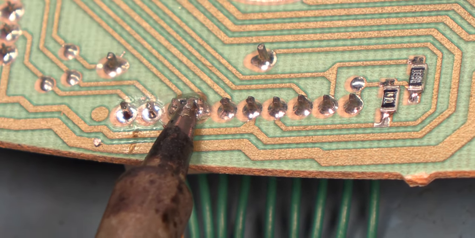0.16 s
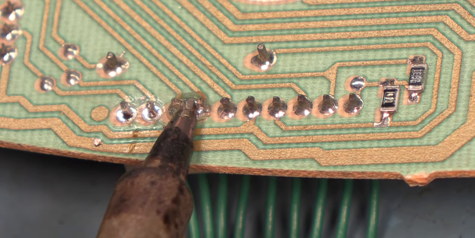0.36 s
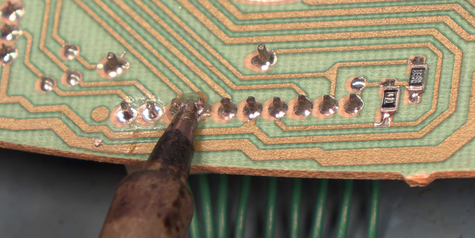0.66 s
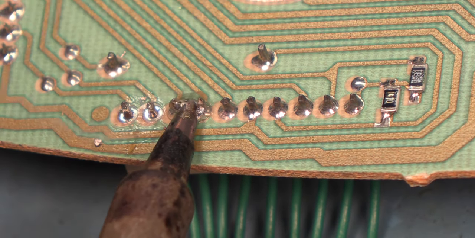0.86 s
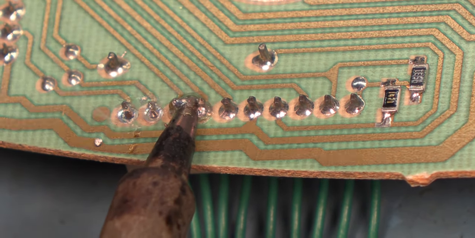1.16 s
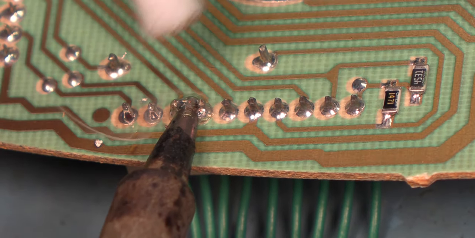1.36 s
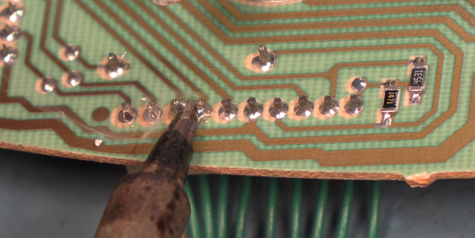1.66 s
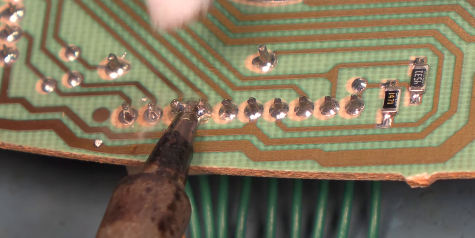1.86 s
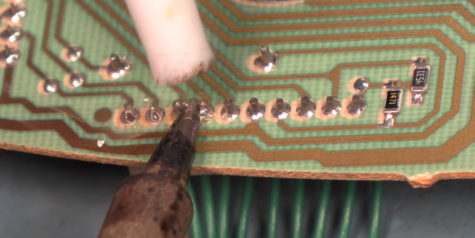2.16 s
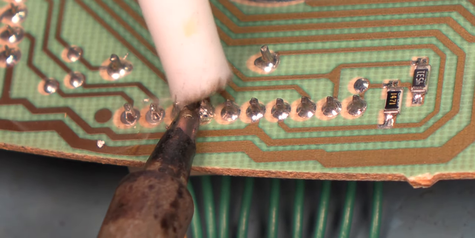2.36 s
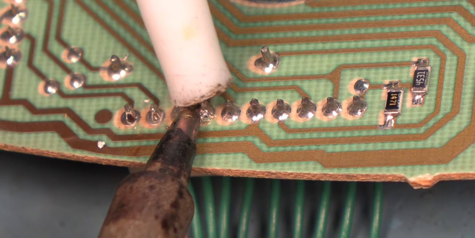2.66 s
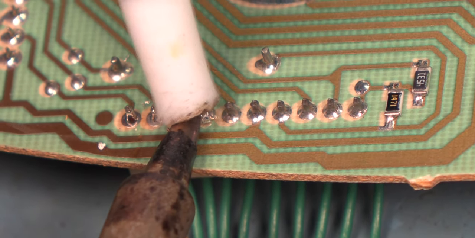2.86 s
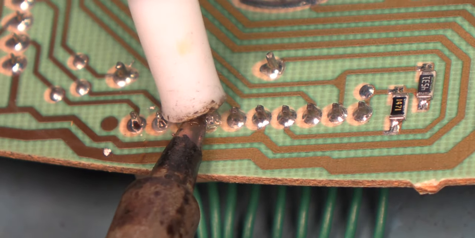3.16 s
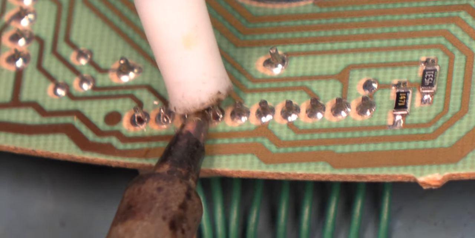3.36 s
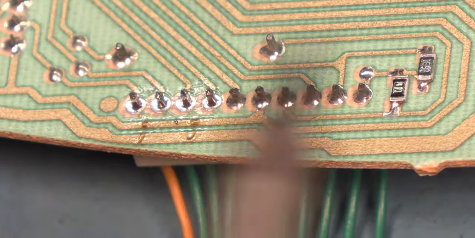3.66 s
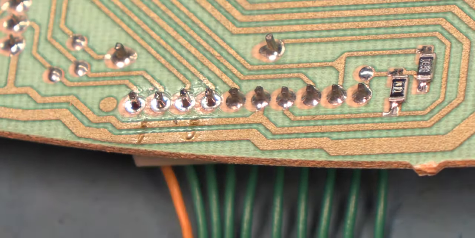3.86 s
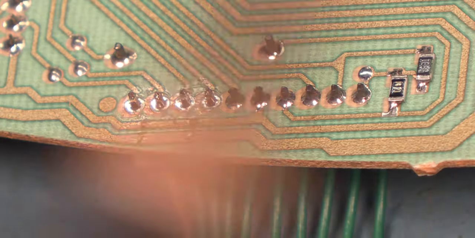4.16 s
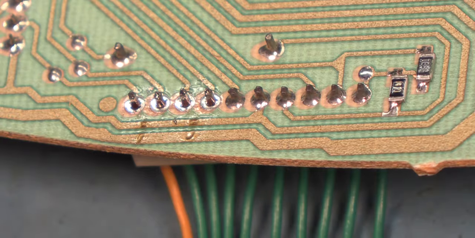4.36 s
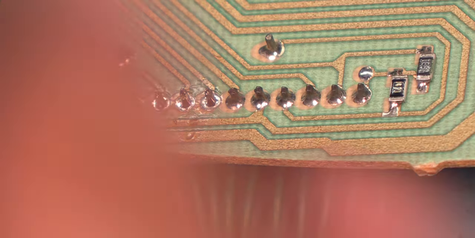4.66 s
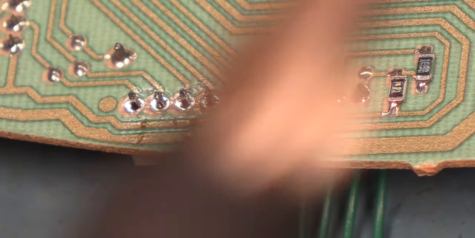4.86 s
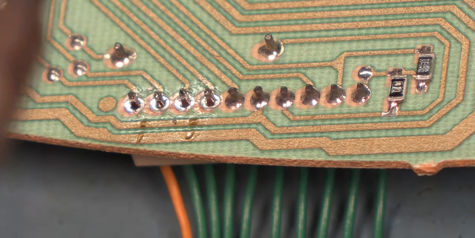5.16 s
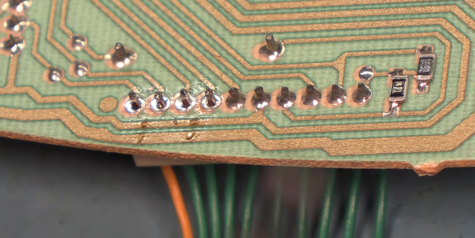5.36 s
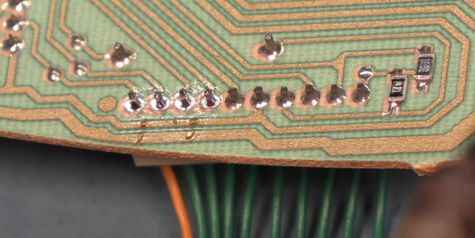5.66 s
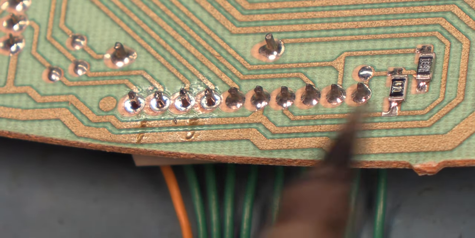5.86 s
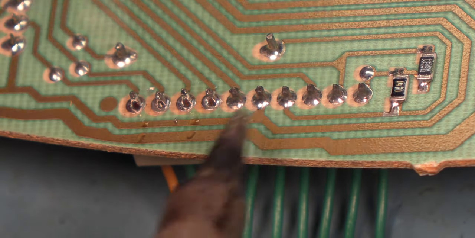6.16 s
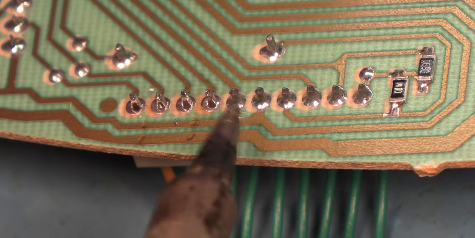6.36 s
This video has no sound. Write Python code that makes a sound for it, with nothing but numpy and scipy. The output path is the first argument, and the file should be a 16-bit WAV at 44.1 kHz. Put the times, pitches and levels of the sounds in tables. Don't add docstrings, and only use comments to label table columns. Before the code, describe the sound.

Quiet workbench handling, then a loud plastic plunger snap, two scraping re-cocking strokes with hard clicks, a faint spring hum and deep bench knocks.

```python
import sys
import numpy as np
from scipy import signal
from scipy.fft import rfft, irfft, next_fast_len
from scipy.io import wavfile
from scipy.ndimage import map_coordinates

SR = 44100
rng = np.random.default_rng(int(sys.argv[2]) if len(sys.argv) > 2 else 0)


def magnitude_from_level(level_db):
    exponent = np.asarray(level_db, float) / 20
    return 10 ** exponent


def generate_wav(sig):
    pcm = np.round(np.clip(np.atleast_2d(sig).T, -1, 1) * 32767).astype(np.int16)
    wavfile.write(sys.argv[1], SR, pcm)


N = 287311

# f/Hz, density/dB per Hz
ROOM_TONE_SPECTRUM = [(12, -28.5), (20, 2.5), (80, -4.5), (123, -3.5), (150, -9), (210, -13.5), (678, -34),
                      (923, -21), (1030, -27.5), (10200, -38.5), (16000, -49)]
# f/Hz, t60/s
ROOM_T60 = [(200, 0.73), (500, 0.24), (1000, 0.16), (3000, 0.21), (6000, 0.19), (14000, .17)]
ROOM_TONE_DB, ROOM_DB = -67, -11.5
HUM_HZ, HUM_DB = 120, -79.5

# t/s, rustle level/dB
HAND_MOTION = [(0.0, -75), (.34, -69), (.56, -75), (.85, -73.5), (1.29, -74), (1.47, -78), (2.27, -99),
               (2.94, -89), (3.5, -85.5), (4.11, -64.5), (4.3, -72), (4.44, -78), (4.57, -45), (4.75, -61),
               (4.91, -40), (5.08, -65), (5.29, -74.5), (6.51, -73)]
# f/Hz, density/dB per Hz
RUSTLE_SPECTRUM = [(530, -32.5), (900, -1), (1170, -7), (1320, -1.5), (2090, -2), (5040, -5),
                   (13200, -18.5), (16000, -29.5)]
# from t/s, to t/s, rumble level/dB
LEANS = [
    (0.0, 0.83, -60.5),
    (1.0, 2.6, -76.5),
    (3.047, 3.566, -55),
    (3.76, 4.152, -63),
    (4.541, 4.64, -56),
    (5.453, 5.478, -42),
    (5.833, 5.902, -45),
    (6.0, 6.397, -55),
]
LEAN_IN_DB_PER_S, LEAN_OFF_DB_PER_S = 118, 49.5

# f/Hz, level/dB, t60/s
BENCH_MODES = [(67, 3, 0.22), (87, 5.5, 0.31), (118, 7.5, 0.25), (148, 3, 0.19), (177.24, 6.5, 0.32),
               (207, 4, 0.25), (268, 11, 0.1), (365, 4, 0.18), (480, 3.5, 0.15), (527, 0.5, 0.043),
               (640, -11, 0.053)]
# t/s, peak level/dB, strongest f/Hz, damping by hand (factor)
THUMPS = [(.029, -56.5, 281, 0.88), (.683, -41, 281, 1.8), (1.684, -55, 265, 2), (1.754, -57.5, 256, 0.91),
          (2.599, -52.5, 97, 1.8), (2.958, -50, 125, 3.3), (3.21, -48, 240, 1.5), (3.078, -47.5, 240, 0.82),
          (3.182, -43, 231.5, 1.22), (5.2705, -17.5, 148, 1.37), (5.2705, -27.5, 327, 1.07),
          (5.297, -30, 213, 0.64), (5.358, -17, 177.7, 1.1), (5.358, -32, 362, 1.3), (5.311, -27, 161, 2),
          (5.377, -36, 180, 1.9), (5.406, -18.5, 151, 1.9), (5.403, -31.5, 340, 1.5),
          (5.427, -29, 182, 1.08), (5.628, -45.5, 174, 0.51), (5.701, -59, 196, 0.6),
          (5.815, -42, 200, 0.76), (5.861, -29, 178, 1.1), (5.97, -45, 186.6, 1.1),
          (6.073, -45, 175.8, 0.82), (6.215, -41.5, 168.8, 1.37), (6.327, -41.5, 94.5, 2.5),
          (6.429, -45.5, 173, 1.07)]
# t/s, peak level/dB, strongest f/Hz, damping (factor)
JOLTS = [(3.421, -12.5, 94, 1.48), (3.421, -24, 270, 2.6), (3.435, -21.5, 70, 3.2), (3.439, -27, 215, 1.1),
         (3.478, -36, 205, 1.8), (3.545, -44, 190, 1.1), (3.615, -48.5, 230, 1.36), (3.99, -45, 336.6, 2.8),
         (4.131, -45.5, 204, 1.5), (4.191, -47.5, 262, 2.4), (4.426, -29, 328.6, 2.6),
         (4.599, -42.5, 127, 1.6), (4.631, -45.5, 90.5, 4.4), (4.658, -40, 362, 2.8), (4.753, -32.5, 91, 5),
         (4.892, -45, 362.4, 2.4)]
# t/s, peak level/dB, strongest f/Hz, damping (factor)
HEEL = [
    (.694, -19, 118, 1.01),
    (.722, -22, 118, 1.46),
]
THUMP_RISE_S, JOLT_RISE_S, HEEL_RISE_S = 0.002, 0.0017, 0.0039
HEEL_FOCUS = 0.7
SPREAD_OCTAVES, SPREAD_PER_DAMPING = 0.18, 0.27
# t/s, peak level/dB, strongest f/Hz, t60/s
KNOCKS = [(0.366, -43.5, 370, 0.037), (0.394, -45.5, 352, 0.045), (0.455, -45, 386, 0.033),
          (0.496, -48, 346, 0.043), (1.18, -68, 934, 0.072), (.029, -59, 348, 0.036), (.337, -49, 400, .04),
          (3.075, -54, 420, .03), (3.179, -52.5, 396, 0.023), (3.197, -56.5, 420, 0.026),
          (3.211, -54.5, 406, .03), (3.419, -22, 440, 0.03), (3.421, -22, 1250, 0.03),
          (3.441, -16, 310, 0.03), (3.464, -28.5, 330, 0.03), (3.573, -48.5, 560, 0.036),
          (3.995, -51, 400, .02), (4.135, -42, 527, 0.12), (4.4263, -22, 417, 0.02),
          (4.629, -20.5, 940, 0.023), (4.658, -29, 340, 0.025), (4.7557, -26, 296, 0.012),
          (4.756, -30, 780, 0.011), (4.891, -28, 363, 0.02), (4.892, -26, 820, 0.02),
          (4.631, -29.5, 382, .02), (5.27, -29.5, 325, 0.043), (5.36, -39, 330, 0.04),
          (5.7, -48, 431.4, 0.031)]
KNOCK_OCTAVES = 0.54

# t/s, peak level/dB, brightest f/Hz, width/octaves
TICKS = [(.012, -66, 1700, 0.07), (.1124, -54, 1690, 0.09), (.1319, -50, 1666, 0.12),
         (.3945, -46.5, 1950, 0.2), (.5, -52.5, 1920, 0.29), (1.1767, -41, 2000, .9),
         (1.429, -53.5, 1850, 0.97), (2.9137, -53.5, 1900, 0.34), (3.9285, -56, 1680, 0.21),
         (4.0516, -57.5, 1100, .2), (4.033, -51.5, 890, 0.12), (4.1261, -44.5, 1780, 0.99),
         (4.134, -42.5, 2140, 0.16), (5.2711, -40, 915, 0.62), (5.7018, -49, 1221, 0.12),
         (5.857, -49, 800, 0.5), (6.3094, -60, 1766, 0.33)]
# t/s, peak level/dB, brightest f/Hz, width/octaves
THIN_TICKS = [(.0712, -57, 3200, .12), (.3611, -53, 3200, .7), (.3685, -50, 4830, 0.24),
              (4.009, -52, 5200, 0.067), (3.927, -57, 4500, 0.46), (4.31, -64, 5200, .3),
              (.394, -40, 4200, 0.96), (.4455, -48, 4200, 0.4), (.4557, -39.5, 5100, 0.73),
              (.5658, -56.5, 3350, 0.98), (5.086, -66, 10500, 0.3), (5.125, -48, 3520, 0.27),
              (.6794, -55.5, 3170, .4), (.7362, -52, 4170, 0.27), (.755, -50.5, 3200, 0.45),
              (.745, -54, 9000, .5), (.764, -50.5, 6000, 0.83), (.65, -62, 3300, .2),
              (.624, -63, 7800, 0.17), (.865, -63, 3670, 0.13), (1.1775, -40.5, 2910, 0.29),
              (1.234, -53, 3970, 0.5), (1.2581, -52, 2850, 0.1), (1.2295, -56, 5100, .2),
              (1.1772, -47, 5100, 0.18), (1.1778, -45, 3730, 0.12), (1.6583, -65, 3340, 0.67),
              (2.915, -54, 3760, 0.21), (2.9525, -54.5, 3550, 0.42), (3.3664, -48, 3600, 0.74),
              (4.007, -44.5, 3120, 0.5), (4.0356, -46.5, 3100, 0.1), (4.117, -44, 3300, 0.91),
              (4.1357, -37, 3870, 0.94), (4.189, -48, 4840, 0.56), (4.3264, -51, 4660, 0.5),
              (5.2723, -43, 2840, 0.64), (5.3584, -44, 3890, 0.56), (5.566, -55, 4040, 1),
              (5.7026, -48.5, 3470, 0.22), (5.7294, -55, 3740, 0.4)]
# narrow t60/s, added t60/s per octave, chatter/s
TICK_DECAY = (0.059, 0.017, 0.0014)
# narrow t60/s, added t60/s per octave, chatter/s
THIN_DECAY = (0.011, 0.017, 0.00093)
# t/s, peak level/dB, brightest f/Hz, t60/s, chatter/s
SCUFFS = [
    (5.283, -38, 1700, 0.28, 0.013),
    (5.362, -43.5, 4500, 0.055, 0.021),
    (5.40, -48.5, 1800, 0.11, 0.027),
    (1.185, -54.5, 2300, 0.47, .02),
]
SCUFF_OCTAVES = 1

# t/s, drive level/dB
STAND_DRAG = [(0.0, -107), (0.016, -73), (0.066, -79), (0.134, -64), (0.158, -63), (0.334, -63),
              (0.4, -50.5), (0.414, -63.5), (0.55, -62.5)]
# f/Hz, width/Hz, level/dB
STAND_MODES = [(340, 74, 2.5), (1780, 66, -8.5), (2040, 150, -12), (2910, 71, -18), (3340, 270, -19.5),
               (4500, 300, -17), (5100, 620, -19)]
# t/s, drive level/dB
ARM_DRAG = [(3.72, -76), (3.8, -69.5), (3.92, -64.5), (3.99, -63.5), (4.02, -78)]
# f/Hz, width/Hz, level/dB
ARM_MODES = [(280, 130, 0), (480, 180, 0), (676, 110, -2)]
# t/s, drive level/dB
GRIP_DRAG = [(4.17, -69.5), (4.35, -58), (4.466, -53), (4.6, -62)]
# f/Hz, width/Hz, level/dB
GRIP_MODES = [(240, 63, 3), (690, 130, 4), (1100, 51, -3.5), (1900, 51, -19.5), (2280, 78, -13)]
# t/s, drive level/dB
SPRING_SHAKE = [(4.85, -60), (4.958, -48.5), (5.078, -55), (5.288, -63), (5.442, -56.5), (5.6, -100)]
# f/Hz, width/Hz, level/dB
SPRING_MODES = [(288, 4, -0.5), (458, 2.6, -4), (572, 3.6, -2), (805.6, 8.3, -4.5), (983, 11, 4),
                (1109, 16, -4), (1210, 18, -3), (1291.7, 13, 3), (1418, 10, -4.5), (1540, 36, -8),
                (1950, 55, -12), (2140, 50, -9), (2340, 90, -9.5), (3730, 150, -17)]
# t/s, drive level/dB
CORD_DRAG = [(5.5, -75.5), (5.656, -68.5), (5.926, -65.5), (6.386, -77), (6.51, -80)]
# f/Hz, width/Hz, level/dB
CORD_MODES = [(770, 140, -1), (1230, 126, 2), (1550, 205, 0.5), (2350, 83, -4.5), (2910, 310, -8)]
CORD_RISE_OCTAVES_PER_S = 0.3

# middle t/s, length/s, f/Hz, rms level/dB
SQUEAKS = [(4.541, .008, 6150, -38), (4.555, .014, 6300, -37), (4.58, .022, 6520, -31),
           (4.598, .01, 5600, -35), (4.611, .012, 6750, -32), (4.595, .02, 4700, -36),
           (4.614, .016, 5100, -33), (4.56, .03, 2480, -40.5), (4.6, 0.018, 2700, -40),
           (4.535, .016, 7600, -40), (4.605, .014, 8380, -36), (4.6, .02, 10000, -37),
           (4.78, .008, 6320, -36), (4.795, .012, 5300, -39), (4.835, .02, 6500, -34),
           (4.846, .014, 5630, -33), (4.84, .012, 7700, -36), (4.858, .01, 8300, -34),
           (4.866, .014, 6500, -31), (4.815, .02, 9400, -36), (4.873, .008, 2300, -38),
           (.09, .07, 2960, -73), (.02, 0.032, 1760, -67), (4.95, .08, 2100, -55), (5.045, .03, 2000, -55),
           (5.045, .02, 3800, -58)]
SQUEAK_WIDTH = 0.035
# t/s, peak level/dB
TOUCHES = [(2.9552, -64), (3.0425, -69), (3.0755, -66), (3.1802, -67), (3.1987, -68), (3.213, -68),
           (3.229, -72), (3.33, -65), (3.3654, -57.5), (3.992, -59), (4.196, -56)]
TOUCH_HZ, TOUCH_T60_S, TOUCH_OCTAVES = 1620, 0.03, 0.14
# t/s, peak level/dB, brightest f/Hz, chatter/s
RATTLES = [
    (4.96, -41, 2400, .012),
    (5.005, -48, 2400, .02),
    (5.033, -42, 2900, 0.017),
    (5.084, -45.5, 2500, .004),
    (5.105, -51.5, 2900, .012),
    (5.1756, -60, 2290, 0.0092),
    (5.21, -60.5, 2600, 0.015),
]
RATTLE_T60_S, RATTLE_OCTAVES = 0.08, 0.44

# t/s, rasp level/dB
RELEASE = [(3.4145, -57), (3.421, -25.5), (3.46, -35.5), (3.5, -47), (3.6, -66), (3.72, -95)]
# t/s, rasp level/dB
STROKES = [
    [(4.385, -94), (4.395, -53), (4.42, -38)],
    [(4.434, -30.5), (4.44, -38), (4.48, -45.5), (4.522, -40), (4.544, -34), (4.614, -27), (4.622, -30.5)],
    [(4.73, -59), (4.738, -45), (4.749, -32.5)],
    [(4.764, -33), (4.77, -41), (4.798, -32), (4.864, -30), (4.884, -35)],
]
# f/Hz, density/dB per Hz
RASP_SPECTRUM = [(880, -48), (1500, -19.5), (3060, -3.5), (4500, -5), (6500, -1), (7900, -3), (12900, -8),
                 (16000, -13.5)]
# f/Hz, width/Hz, level/dB
BARREL_MODES = [(2400, 250, -11.5), (3550, 79, -20.5), (4880, 420, -5), (5600, 300, -1.5), (6700, 120, -5),
                (7600, 710, 0.5), (8350, 290, -5.5), (10000, 680, 6), (10500, 400, -12), (13300, 900, -11),
                (14200, 400, -7)]
SETTLE_S, STICK_DB, SEAL_DB = 0.03, 8.5, 8.5
WANDER_OCTAVES = 0.05
# t/s, peak level/dB, brightest f/Hz, t60/s, width/octaves
CLACKS = [(3.4196, -11.5, 9140, .015, .25), (3.4211, -8, 4300, .012, .4), (3.423, -8, 1480, .016, .4),
          (3.4354, -4.5, 4630, .015, 0.97), (3.442, -14.5, 8905, .015, .4), (3.449, -17.5, 3600, 0.023, .4),
          (4.399, -31, 1941, .016, .3), (4.4286, -15, 2580, 0.017, 0.69), (4.6312, -4.5, 3600, 0.008, .5),
          (4.6314, -2, 5395, .007, .25), (4.6334, -10.5, 9000, .007, 0.26), (4.6318, -5, 13500, .007, .1),
          (4.634, -14, 6286, 0.01, .16), (4.7572, -10, 3200, 0.014, 0.73), (4.8928, -16, 2600, 0.008, 0.25),
          (4.893, -5.5, 4200, .011, .8)]
CLACK_CHATTER_S, CLEAN_OCTAVES = 0.0016, 0.3
# t/s, peak level/dB, f/Hz, t60/s
PINGS = [(4.8927, -9.5, 2350, .018), (4.8929, -6, 2600, .011), (4.8927, -14, 2920, .01),
         (3.4215, -21, 1150, .03), (4.6329, -9, 6300, .012), (4.8928, -25, 3680, .03),
         (4.8928, -22, 5800, .02), (4.9025, -27, 2500, .02), (4.8928, -20, 7100, .014),
         (4.8928, -19, 8500, .014), (4.897, -28, 1500, .02), (3.4358, -18.5, 2300, 0.018),
         (3.4362, -17, 8000, .015), (4.7575, -21, 8600, .014), (4.7575, -20, 6000, .014),
         (4.6318, -14, 9200, .012), (5.2725, -26.5, 365, .1), (5.3595, -26, 365, .11),
         (5.36, -38, 500, .11), (5.398, -33, 375, .11), (5.272, -23, 148, .1), (5.297, -32, 285, .11),
         (5.398, -33.5, 280, .12), (5.272, -50, 930, .08), (5.66, -48, 207, .6), (5.872, -42, 90, .3),
         (5.885, -46, 278, .13), (5.975, -51, 100, .4), (6.03, -54, 207, .3), (6.078, -49, 88, .3),
         (6.222, -50, 90, .3)]
PING_RISE_CYCLES = 0.72


def rms_one(x):
    return x / np.sqrt(np.mean(x ** 2) + 1e-20)


def in_time(rows, outside=None):
    s, *columns = np.transpose(rows)
    t = np.arange(N) / SR
    return [np.interp(t, s, column, outside, outside) for column in columns]


def at_hz(points, hz):
    point_hz, value = np.transpose(points)
    return np.interp(np.log(hz), np.log(point_hz), value)


def band(x, low_hz, high_hz):
    edges_hz = [low_hz, min(high_hz, 0.45 * SR)]
    return signal.sosfilt(signal.butter(2, edges_hz, "band", fs=SR, output="sos"), x)


def colour(x, spectrum):
    size = next_fast_len(N)
    hz = np.maximum(np.arange(size // 2 + 1) * SR / size, 1)
    return rms_one(irfft(rfft(x, size) * magnitude_from_level(at_hz(spectrum, hz)), size)[:N])


def drift(rate_hz):
    r = np.exp(-2 * np.pi * rate_hz / SR)
    return rms_one(signal.lfilter([1], [1, -2 * r, r * r], rng.standard_normal(N + SR))[SR:])


def grains(per_s, spread_db):
    sizes = magnitude_from_level(spread_db * np.minimum(rng.exponential(1, N), 4)) * rng.choice([-1, 1], N)
    return sizes * (rng.random(N) < per_s / SR) + 1e-18


def ring(clicks, hz, t60):
    r, w = magnitude_from_level(-60 / (t60 * SR)), 2 * np.pi * hz / SR
    return signal.lfilter([0, np.sin(w)], [1, -2 * r * np.cos(w), r * r], clicks + 1e-18)


def resonate(x, modes):
    out = 0
    for k, (hz, width_hz, level_db) in enumerate(modes):
        r = np.exp(-np.pi * width_hz / SR)
        zeros = [(1 - r * r) / 2, 0, (r * r - 1) / 2]
        poles = [1, -2 * r * np.cos(2 * np.pi * hz / SR), r * r]
        out = out + (-1) ** k * magnitude_from_level(level_db) * signal.lfilter(zeros, poles, x)
    return out


def detuned(x, octaves):
    return map_coordinates(x, [np.cumsum(2 ** octaves)], order=3, mode="grid-wrap")


def contacts(table, broad_db, tap=4.5):
    out, t = np.zeros(N), np.arange(SR // 8) / SR
    noises = rng.standard_normal((len(table), 2, len(t)))
    for (s, level_db, hz, t60, octaves, chatter_s), noise in zip(table, noises):
        decay = magnitude_from_level(-60 * np.maximum(t - chatter_s, 0) / max(t60, 0.002))
        bright, broad = (noise + tap * (t == 0)) * decay
        spread = 2 ** np.clip(octaves, 0.05, 1.5)
        burst = rms_one(band(bright, hz / spread, hz * spread))
        burst = burst + magnitude_from_level(broad_db) * rms_one(band(broad, 1900, 9500))
        i = round(s * SR)
        out[i:i + len(t)] += (magnitude_from_level(level_db) * burst / np.abs(burst).max())[:N - i]
    return out


def room_tone():
    hum = np.sin(2 * np.pi * HUM_HZ * np.arange(N) / SR) * magnitude_from_level(HUM_DB + 2.7 * drift(3))
    return magnitude_from_level(ROOM_TONE_DB) * colour(rng.standard_normal(N), ROOM_TONE_SPECTRUM) + hum


def leaning():
    t = np.arange(N) / SR
    weights_db = []
    for start, end, db in LEANS:
        before_db = LEAN_IN_DB_PER_S * np.maximum(start - t, 0)
        after_db = LEAN_OFF_DB_PER_S * np.maximum(t - end, 0)
        weights_db.append(db - before_db - after_db)
    return np.max(weights_db, axis=0)


def hands():
    rustle_db, = in_time(HAND_MOTION)
    rustle = colour(grains(9000, 2.5), RUSTLE_SPECTRUM) * magnitude_from_level(rustle_db + 2.2 * drift(15))
    hover_db, = in_time([(0.78, 0), (0.86, -5), (1.28, -5), (1.351, 0)])
    rub_db = -69.5 + 0.48 * (np.minimum(rustle_db, -71) + 69) + hover_db
    rub = rms_one(band(grains(1200, 2.5), 140, 700)) * magnitude_from_level(rub_db + 2.2 * drift(10))
    nudges = grains(520, 3.5)
    rumble = rms_one(sum(magnitude_from_level(db) * ring(nudges, hz, 0.66 * t60) for hz, db, t60 in BENCH_MODES[:6]))
    return rustle + rub + rumble * magnitude_from_level(leaning() - 5 + 3 * drift(16))


def rubbed(drive, modes, passes=1, rise=0):
    sound = rng.standard_normal(N)
    for _ in range(passes):
        sound = resonate(sound, np.array(modes) / [1, 1, passes])
    if rise:
        since = np.arange(N) / SR - drive[2][0]
        sound = detuned(sound, np.clip(rise * since, -0.2, 0.08))
    return rms_one(sound) * magnitude_from_level(in_time(drive, outside=-200)[0])


def rubbed_things():
    stand = rubbed(STAND_DRAG, STAND_MODES)
    arm = rubbed(ARM_DRAG, ARM_MODES)
    grip = rubbed(GRIP_DRAG, GRIP_MODES, passes=2)
    coil = rubbed(SPRING_SHAKE, SPRING_MODES)
    cord = rubbed(CORD_DRAG, CORD_MODES, rise=CORD_RISE_OCTAVES_PER_S)
    return stand + arm + grip + coil + cord


def of_kind(table, decay):
    t60, per_octave, chatter_s = decay
    return [(s, db, hz, t60 + per_octave * octaves, octaves, chatter_s) for s, db, hz, octaves in table]


def ticks_and_scuffs():
    scuffs = [(*row, SCUFF_OCTAVES, chatter_s) for *row, chatter_s in SCUFFS]
    ticks = contacts(of_kind(TICKS, TICK_DECAY) + scuffs, broad_db=-12.5)
    return ticks + contacts(of_kind(THIN_TICKS, THIN_DECAY), broad_db=-13.5)


def squeaks():
    out = np.zeros(N)
    noises = rng.standard_normal((len(SQUEAKS), SR // 5))
    for (s, length_s, hz, level_db), noise in zip(SQUEAKS, noises):
        t = np.arange(len(noise)) / SR - 0.1
        swell = np.exp(-0.5 * (2 * t / length_s) ** 2)
        tone = band(noise, hz * (1 - SQUEAK_WIDTH), hz * (1 + SQUEAK_WIDTH)) * swell
        burst = magnitude_from_level(level_db) * tone / np.sqrt(np.sum(tone ** 2) / np.sum(swell ** 2))
        i = round((s - 0.1) * SR)
        out[max(i, 0):i + len(t)] += burst[max(-i, 0):]
    return out


def blows():
    kinds = [(THUMPS, THUMP_RISE_S, 1), (JOLTS, JOLT_RISE_S, 1), (HEEL, HEEL_RISE_S, HEEL_FOCUS)]
    return [(s, db, hz, focus * (SPREAD_OCTAVES + SPREAD_PER_DAMPING * damping), rise_s, damping)
            for table, rise_s, focus in kinds
            for s, db, hz, damping in table]


def bench():
    hz, mode_db, t60 = np.transpose(BENCH_MODES)[:, :, None]
    out, t = np.zeros(N), np.arange(SR // 2) / SR
    tones = np.sin(2 * np.pi * hz * t)
    for s, level_db, centre_hz, spread, rise_s, damping in blows():
        luck_db = 2.4 * rng.standard_normal((len(BENCH_MODES), 1))
        favour_db = -6 * (np.log2(hz / centre_hz) / max(spread, 0.1)) ** 2 + luck_db
        modes = magnitude_from_level(mode_db + favour_db - 60 * t * max(damping, 0.3) / t60) * tones
        swell = (1 - np.exp(-t / max(rise_s, 0.0005))) ** 2
        i = round(s * SR)
        out[i:i + len(t)] -= (magnitude_from_level(level_db - 8) * modes.sum(axis=0) * swell)[:N - i]
    return out


def dull_knocks():
    rows = [(s + 0.0015, *knock, KNOCK_OCTAVES, 0.001) for s, *knock in KNOCKS]
    return contacts(rows, broad_db=-38, tap=21)


def loose_parts():
    touches = [(s, db, TOUCH_HZ, TOUCH_T60_S, TOUCH_OCTAVES, 0.003) for s, db in TOUCHES]
    rattles = [(s, db, hz, RATTLE_T60_S, RATTLE_OCTAVES, chatter_s) for s, db, hz, chatter_s in RATTLES]
    return contacts(touches, broad_db=-6.5) + contacts(rattles, broad_db=-17)


def plunger():
    slips = colour(grains(20000, 2.4), RASP_SPECTRUM)
    rung = detuned(resonate(slips[::-1], BARREL_MODES), WANDER_OCTAVES * drift(9.8))
    plain = rms_one(band(slips, 2200, 9900))
    ringing = rms_one(band(rung, 2200, 11000))
    hiss = rms_one(band(slips[::-1], 9500, 16500))
    dull = rms_one(band(grains(4000, 3.6), 590, 3300))
    out, t = 0, np.arange(N) / SR
    for stroke in [RELEASE] + STROKES:
        rasp_db, = in_time(stroke)
        since = np.maximum(t - stroke[0][0], 0)
        ring_db = 0.35 * (rasp_db + 30) - 7.5
        if stroke is RELEASE:
            ring_db = ring_db - 8.1
            dull_db = -40.5 * since
            hiss_db = -4.5 - 70.5 * since
        else:
            stuck = np.exp(-since / SETTLE_S)
            dull_db = -14.5 - 0.13 * (rasp_db + 31) + STICK_DB * stuck
            hiss_db = -4 - SEAL_DB * stuck
        moving = np.clip(since / 0.0022, 0, 1) ** 2 * (t < stroke[-1][0] + 0.008)
        scrape = plain + magnitude_from_level(ring_db) * ringing + magnitude_from_level(dull_db) * dull + magnitude_from_level(hiss_db) * hiss
        out = out + moving * magnitude_from_level(rasp_db - 1.5) * scrape
    return out * magnitude_from_level(0.9 * drift(60))


def clacks():
    rows = [(*row, CLACK_CHATTER_S * min(row[-1] / CLEAN_OCTAVES, 1)) for row in CLACKS]
    hits = contacts(rows, broad_db=1, tap=7.3)
    return hits + magnitude_from_level(-11) * resonate(hits, BARREL_MODES)


def pings():
    out, t = np.zeros(N), np.arange(SR // 4) / SR
    for s, level_db, hz, t60 in PINGS:
        swell = 1 - np.exp(-t * hz / PING_RISE_CYCLES)
        fade = np.cos(2 * np.pi * t)
        i = round(s * SR)
        out[i:i + len(t)] -= magnitude_from_level(level_db - 60 * t / t60) * np.sin(2 * np.pi * hz * t) * swell * fade
    return out


def room(x):
    t, tail = np.arange(SR // 2) / SR, 0
    for hz in 180 * 2. ** np.arange(7):
        noise = band(rng.standard_normal(len(t)), hz / 2 ** 0.5, hz * 2 ** 0.5)
        tail = tail + noise * magnitude_from_level(-60 * t / at_hz(ROOM_T60, hz))
    tail = tail * np.clip(t / 0.0016, 0, 1)
    return signal.fftconvolve(x, tail / np.sqrt(np.sum(tail ** 2)))[:N]


def scene():
    near = ticks_and_scuffs() + loose_parts() + plunger() + clacks() + pings()
    knocks = dull_knocks()
    tail = magnitude_from_level(ROOM_DB) * room(near + magnitude_from_level(-6.5) * knocks)
    steady = room_tone() + hands() + rubbed_things()
    return (near + knocks + tail + steady + bench() + squeaks())[None]


def band_limit(x):
    return signal.sosfilt(signal.butter(12, 16050, fs=SR, output="sos"), x)


def record(dry):
    heard = signal.sosfilt(signal.butter(4, 50, "high", fs=SR, output="sos"), dry)
    return band_limit(1.367 * np.tanh(heard / 1.447))


dry = scene()
out = record(dry)
generate_wav(out)
```